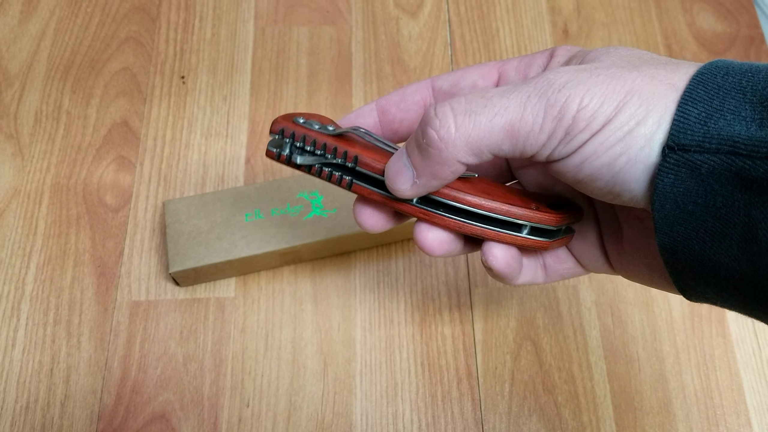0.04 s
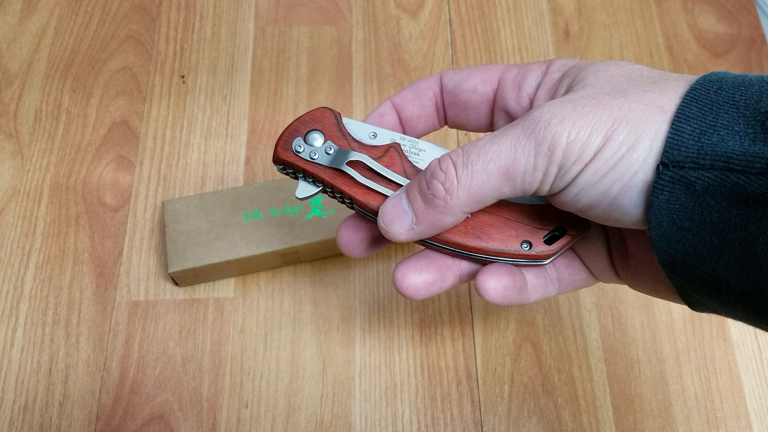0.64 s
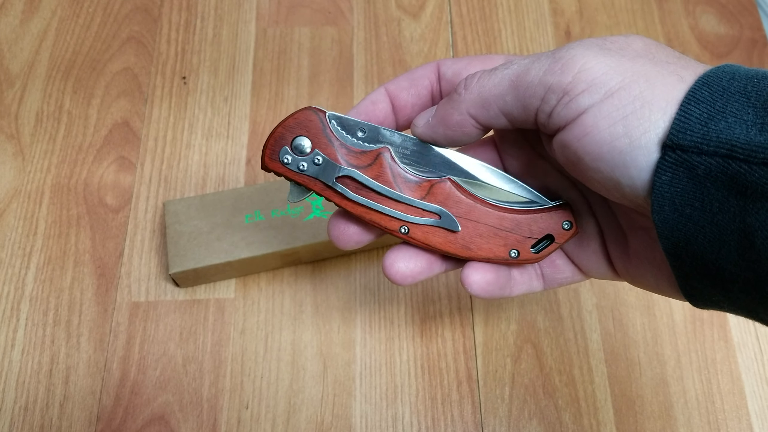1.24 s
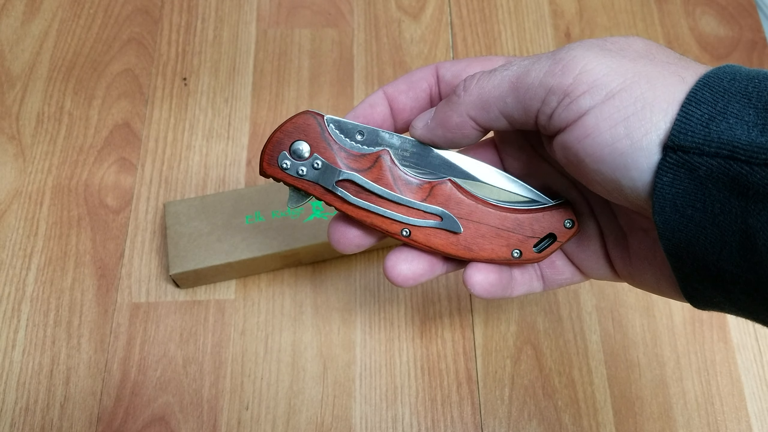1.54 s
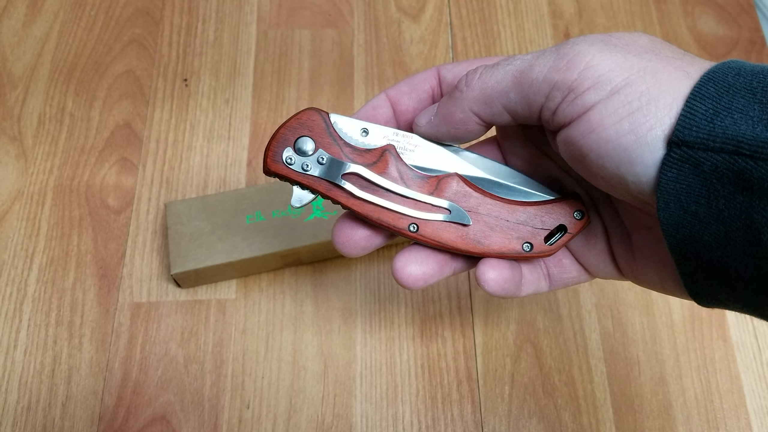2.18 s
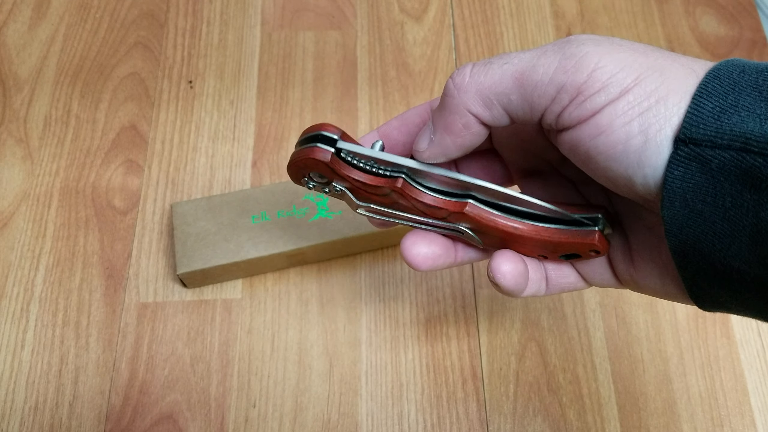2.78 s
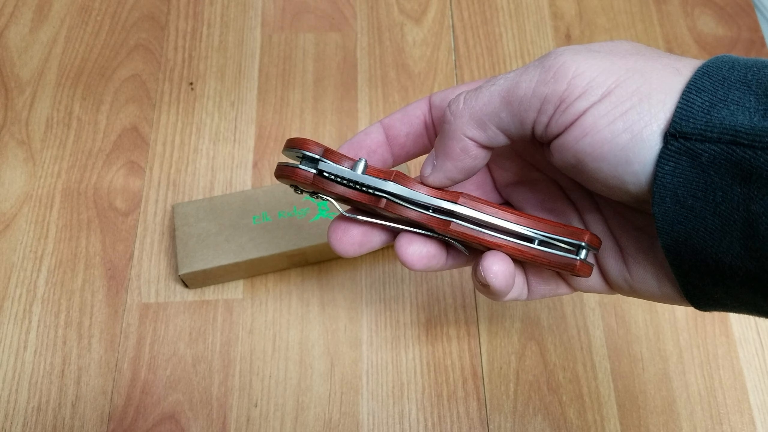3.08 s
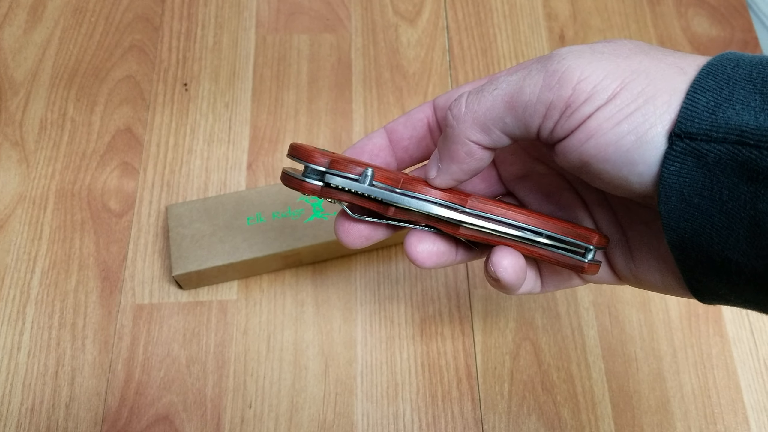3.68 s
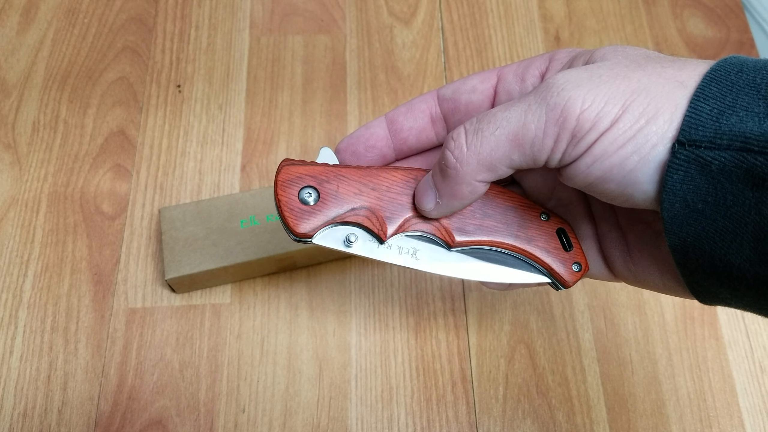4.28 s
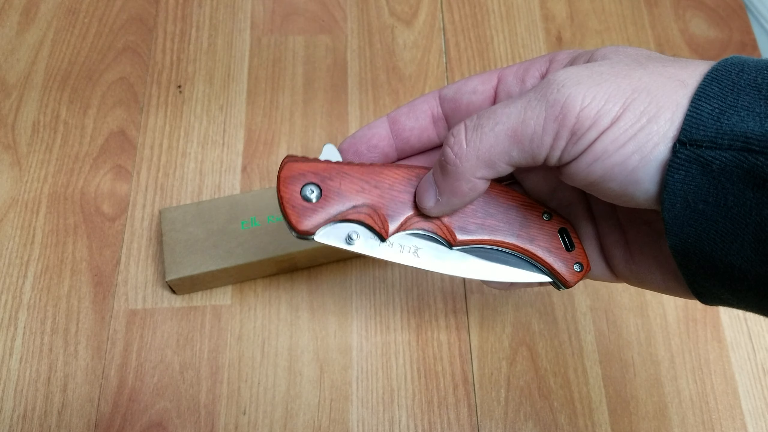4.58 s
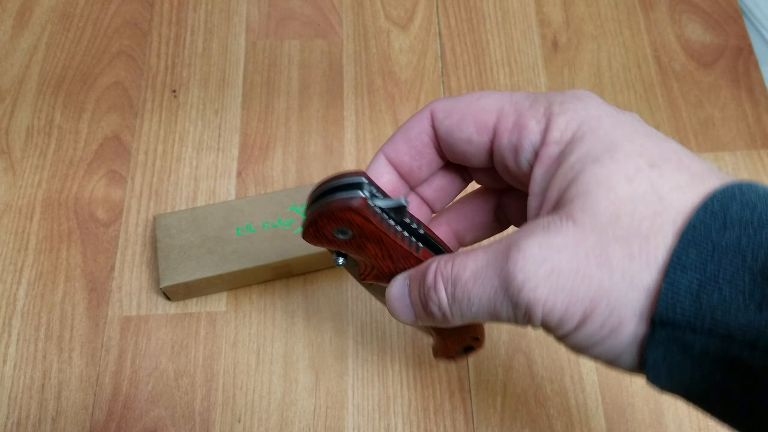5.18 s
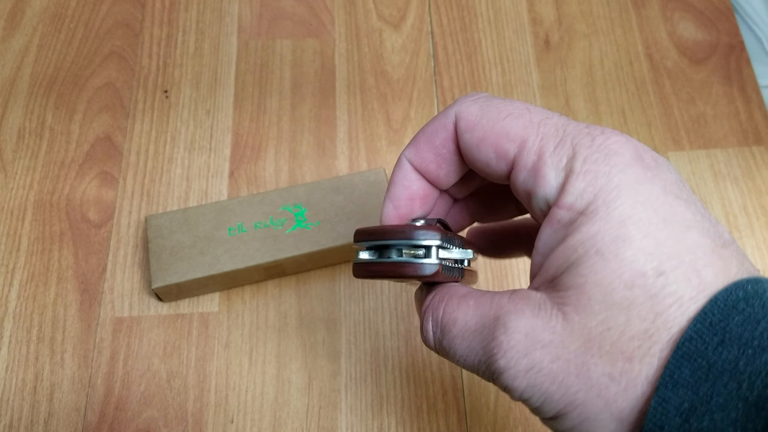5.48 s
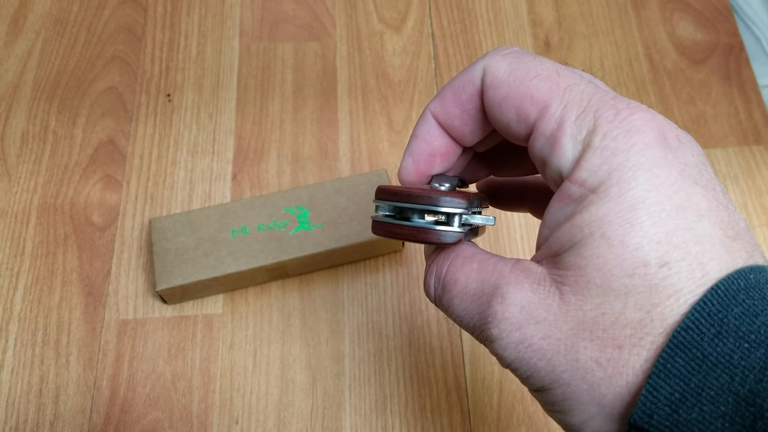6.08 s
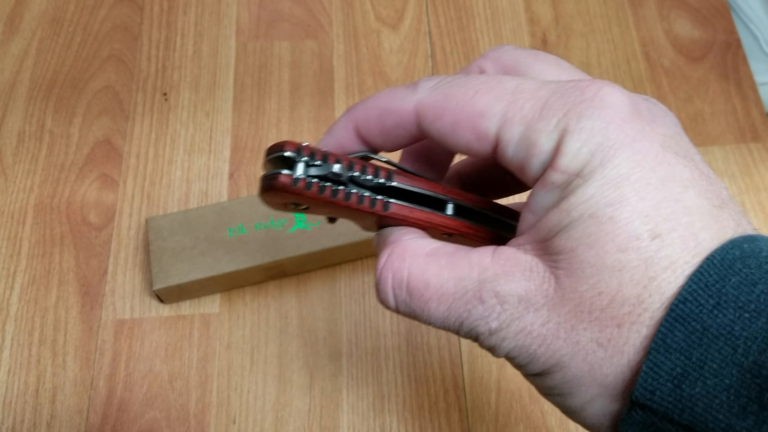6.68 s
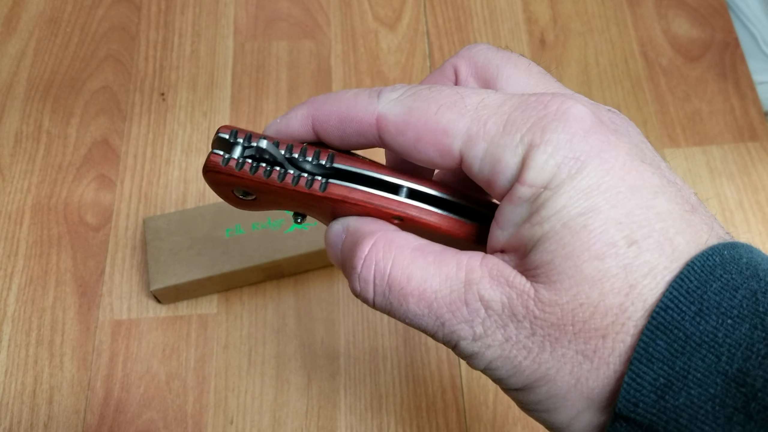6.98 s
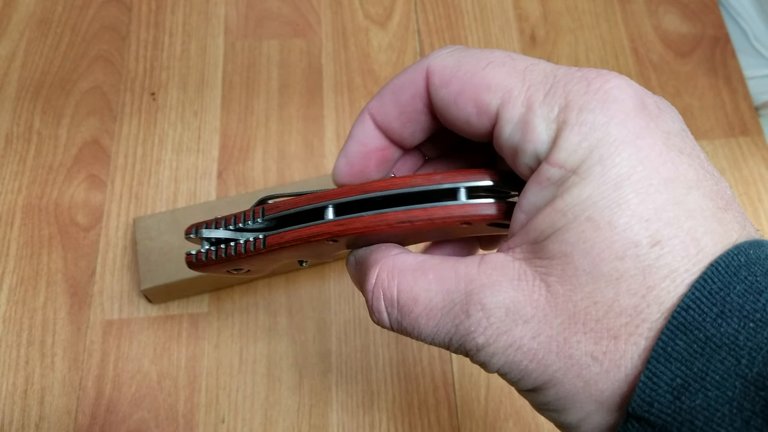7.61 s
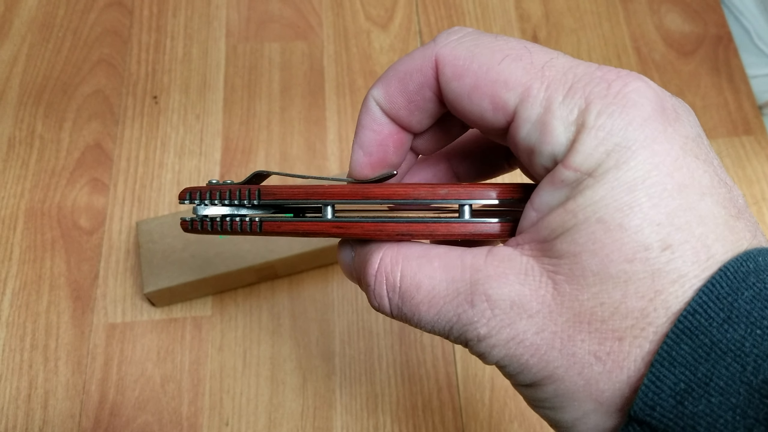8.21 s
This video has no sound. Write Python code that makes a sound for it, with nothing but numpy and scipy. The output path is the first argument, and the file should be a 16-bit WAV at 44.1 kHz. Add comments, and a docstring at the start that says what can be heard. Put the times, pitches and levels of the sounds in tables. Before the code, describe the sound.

Close handling of a folded pocket knife indoors: small metal clicks, finger taps, sliding skin, a heavy thump and a sharp metallic snap.

```python
"""A closed folding knife is turned over in one hand, close to a stereo microphone in a small quiet room.
Its steel parts click and once snap sharply, a little left of centre. Fingers tap the handle, skin slides
and squeaks over it, a sleeve rustles, and dull knocks reach the microphone, one of them heavy.
Under it all lie room tone, microphone hiss and a low rumble that dies away halfway through."""
import sys
import numpy as np
from scipy import signal
from scipy.fft import rfft, irfft
from scipy.io import wavfile
from scipy.ndimage import uniform_filter1d

SR = 44100
rng = np.random.default_rng(int(sys.argv[2]) if len(sys.argv) > 2 else 0)


def put_to_file(sound):
    """Save the sound as 16-bit audio at rate SR, in the file named by the first command-line argument."""
    columns = np.atleast_2d(sound).T  # one column per channel
    safe = np.clip(columns, -1, 1)
    whole_steps = np.round(safe * 32767)
    wavfile.write(sys.argv[1], SR, whole_steps.astype(np.int16))


N = 372644


def clicks(centre_hz=3270, lowest_hz=500, clack_octaves=0.89, rise_s=0.0022, size=16384):
    """The hand damps the steel, so a click has colour but no pitch; duller contacts rise more slowly."""
    # steel contacts: (time [s], level [dB], brightness [dB/octave], clack of the handle [dB])
    contacts = [(0.077, -61.5, 0, 1), (0.268, -57, 1.5, -4), (1.0648, -59, 2.5, 4.5),
                (1.2104, -57, -2.2, 6), (1.462, -59.5, -1.5, 1.5), (1.7746, -66, -1.5, 5.5),
                (2.1105, -58, -7, 7), (2.179, -66.5, -8, 7), (2.443, -62.5, -7.5, 9.5),
                (4.238, -54, 2.5, -1.5), (4.9305, -56.5, 2.5, -1), (5.071, -53.5, 1, -2.5),
                (5.8488, -52, 0.5, -5.5), (5.8781, -49.5, 2, -5.5), (5.9818, -66.5, -4, 9.5),
                (6.25, -63.5, -3, 7.5), (6.4163, -64.5, 2.5, 1.5), (6.569, -57.5, -4, 6),
                (6.6456, -59.5, -6.5, 18), (6.679, -55, -2.5, 8.5), (6.821, -48.5, -3, -6),
                (6.9863, -53.5, -4, -2.5), (7.045, -71, 1, 11.5), (7.0682, -56.5, -3, -3),
                (8.029, -58.5, 2.5, 14.5)]
    # colour of a click: (frequency [Hz], density [dB])
    colour = [(150, -17), (400, 2), (850, 0.5), (1250, 3), (1700, -3), (2200, 0), (3200, -2), (5000, -3),
              (6600, -6.5), (7500, -5), (9000, -7.5), (10700, -3.5), (12300, -3.5), (14000, -5.5),
              (16000, -2.5)]
    # damped resonances of liners and blade: (centre [Hz], width [Hz], boost [dB])
    rings = [(2280, 700, 5), (2900, 420, 2.5), (4630, 600, 4.5)]
    out, t, hz = np.zeros((2, N)), np.arange(size) / SR, np.fft.rfftfreq(size, 1 / SR)
    octaves = np.log2(np.maximum(hz, lowest_hz) / centre_hz)
    clack_hump = np.exp(-.5 * (octaves / clack_octaves) ** 2)
    rings_db = peaks_db(rings, hz)
    for start, db, brightness, clack_db in contacts:
        spray = noise(colour, size, db + brightness * octaves + clack_db * clack_hump + rings_db)
        rise = rise_s / 2 ** (brightness / 7.5)  # 7.5 dB/octave brighter is twice as quick
        add(out, start, spray * strike(t, rise, t60_s=0.19, tick=1.1, tick_s=0.0034))
    return out * pan(2.8)


def snap(size=16384):
    """Steel on steel: a hard, dry snap that rattles briefly and brings out the metal's resonances."""
    # the snap and its two rebounds: (time [s], level [dB])
    hits = [(5.1005, -38.5), (5.105, -41.5), (5.123, -51.5)]
    # colour of the snap: (frequency [Hz], density [dB])
    colour = [(150, -12), (400, -3.5), (700, -15.5), (1000, -16.5), (2200, -5), (4500, -8), (6600, -11),
              (9000, -13.5), (12000, -8.5), (16000, -10)]
    # quickly damped resonances: (centre [Hz], width [Hz], boost [dB])
    rings = [(1730, 780, 7), (7500, 520, -2), (10800, 900, 4), (13900, 700, 8), (15400, 500, 8)]
    out, t, hz = np.zeros((2, N)), np.arange(size) / SR, np.fft.rfftfreq(size, 1 / SR)
    envelope = strike(t, rise_s=0.00064, t60_s=0.155, tick=0.98, tick_s=0.0026)
    for start, db in hits:
        add(out, start, amp(db) * noise(colour, size, peaks_db(rings, hz)) * envelope)
    return out * pan(2.4)


def knocks(decay_s=0.016, scuff_db=1, scuff_growth=0.57, size=16384):
    """Soft contacts reach the microphone as low modes, with a dull scuff that grows with force."""
    # dull knocks: (time [s], boom level [dB], knock above boom [dB], tilt [dB/octave], rise [s])
    contacts = [(1.063, -44, -3, -1.5, 0.0032), (2.8443, -32, -3, 0.5, 0.0035),
                (2.862, -32, -11.5, -2.5, 0.0023), (3.894, -16, -4, 1, 0.011),
                (3.943, -26.5, -24, -6, 0.0022), (4.258, -42, -4, -10.5, 0.0029),
                (5.098, -54.5, 2, -12, 0.0098)]
    # modes of the deep boom: (frequency [Hz], level [dB])
    boom_modes = [(78, -20), (100, -3.5), (128, -3), (197, 7.5), (216, -5)]
    # modes of the knock above it: (frequency [Hz], level [dB])
    knock_modes = [(272, 5.5), (302, 7.5), (345, 3), (421, 7.5), (512, 2), (594, -4), (677, -8.5),
                   (761, -11.5), (911, -14), (1055, -13), (1320, -22.5)]
    # colour of the scuff: (frequency [Hz], density [dB])
    scuff_colour = [(200, -3.5), (500, -2.5), (900, -2.5), (1300, -7.5), (1750, -12.5), (2300, -13),
                    (3200, -24), (5000, -34), (8000, -46), (12000, -41), (16000, -38)]
    out, t = np.zeros((2, N)), np.arange(size) / SR
    for start, db, above_db, tilt, rise in contacts:
        boom = ringing(boom_modes, t, tilt) * pan(2.2)
        knock = amp(above_db) * ringing(knock_modes, t, tilt) * pan(0.34)
        ring = (boom + knock) * swell(t, rise, decay_s)
        scuff = amp(above_db + scuff_db + scuff_growth * db) * noise(scuff_colour, size) * pan(4.46)
        scuff *= swell(t, 0.888 * rise, 1.6 * decay_s)
        add(out, start, amp(db) * (ring + scuff))
    return out


def taps(overtone_ratio=1.55, overtone_db=-6, puff_db=-10, size=8192):
    """A fingertip damps its own tap: a few cycles of two low modes and a soft puff."""
    # fingertips on the handle: (time [s], level [dB], pitch [Hz])
    touches = [(0.054, -45.5, 227), (0.117, -46, 230), (0.158, -46.5, 240), (0.237, -48.5, 343),
               (0.275, -47.5, 225), (1.016, -55.5, 366), (1.065, -38, 361), (1.106, -47.5, 225),
               (1.196, -53.5, 277), (1.33, -48, 315), (1.463, -48, 223), (2.109, -46.5, 227),
               (3.034, -51, 276), (3.128, -53.5, 270), (3.769, -48, 221), (6.983, -52.5, 278),
               (7.045, -54, 255), (8.182, -49.5, 327)]
    # colour of the puff: (frequency [Hz], density [dB])
    puff_colour = [(50, -18.0), (200, 5), (450, -5.5), (900, -12.5), (4000, -44)]
    out, t = np.zeros((2, N)), np.arange(size) / SR
    for start, db, hz in touches:
        phase = 2 * np.pi * hz * t
        tone = np.sin(phase) + amp(overtone_db) * np.sin(overtone_ratio * phase)
        puff = amp(puff_db) * noise(puff_colour, size)
        add(out, start, amp(db) * (tone + puff) * swell(t, rise_s=0.0026, decay_s=0.0088))
    return out * pan(0.73)


def sliding(grain_db=1.2, unevenness_db=2.5):
    """Skin catches and slips on wood and steel: an uneven hiss that follows the fingers."""
    # strokes over the handle: (start [s], length [s], rub level [dB], fizz level [dB])
    strokes = [(0.993, 0.069, -83, -74), (1.283, 0.33, -67.5, -71.5), (1.93, 0.22, -66.5, -71.5),
               (2.439, 0.27, -62, -64), (2.613, 0.5, -57.5, -63), (4.36, 0.3, -74.5, -71),
               (5.804, 0.065, -66.5, -70), (6.238, 0.17, -69.5, -73.5), (6.522, 0.07, -59.5, -71),
               (6.73, 0.19, -64.5, -72), (7.01, 0.66, -72, -75.5), (7.59, 0.16, -69.5, -70),
               (8.116, 0.29, -67.5, -95)]
    # midrange rub of skin: (frequency [Hz], density [dB])
    rub_colour = [(200, -7), (430, 4.5), (700, 0.5), (1400, -3), (2300, 3), (3300, -6.5), (4800, -2.5),
                  (7000, -29), (16000, -29)]
    # treble fizz above it: (frequency [Hz], density [dB])
    fizz_colour = [(3000, -18.5), (6000, 1), (9000, -2.5), (11500, 3.5), (15500, 1)]
    rub, fizz = np.zeros(N), np.zeros(N)
    for start, length, rub_db, fizz_db in strokes:
        pressure = arch(start, length)
        rub += amp(rub_db) * pressure
        fizz += amp(fizz_db) * pressure
    catches = unit_rms(uniform_filter1d(rng.standard_normal(N), size=200))
    drift = unit_rms(uniform_filter1d(rng.standard_normal(N), size=1500))
    grain = amp(grain_db * catches + unevenness_db * drift)
    return grain * (rub * noise(rub_colour, N) + fizz * noise(fizz_colour, N)) * pan(3.2)


def squeaks(size=8192):
    """Slipping skin briefly settles on one fuzzy pitch."""
    # slips on wood and steel: (time [s], pitch [Hz], level [dB], length [s])
    slips = [(0.714, 5700, -73, 0.039), (2.277, 5360, -72, 0.07), (2.434, 2190, -51, 0.028),
             (6.543, 1250, -58, 0.017)]
    # colour of a squeak: (frequency [multiple of the pitch], density [dB])
    colour = [(.3, -56), (.7, -57), (.88, 6.5), (1, 1), (1.12, -28), (1.5, -23), (3, -62)]
    out = np.zeros((2, N))
    for start, hz, db, length in slips:
        window = np.hanning(round(length * SR))
        whistle = noise([(multiple * hz, level) for multiple, level in colour], size)
        add(out, start, amp(db) * whistle[:, :len(window)] * window)
    return out * pan(5)


def sleeve(level_db=-60.5):
    """One soft, dull rustle of cloth as the wrist rolls the knife over."""
    # colour of the cloth: (frequency [Hz], density [dB])
    colour = [(100, -9), (220, -1), (430, 8.5), (800, -2.5), (1400, -12.5), (2300, -11), (5000, -31),
              (16000, -36.5)]
    return amp(level_db) * arch(start_s=3.464, length_s=0.9) * noise(colour, N) * pan(1.4)


def room(sound, build_s=0.028, size=32768):
    """The small room answers with a short diffuse tail, each band dying at its own speed."""
    # colour of the reflections: (frequency [Hz], level [dB])
    colour = [(60, -1.5), (200, -6), (300, -2.5), (430, 4.5), (700, -8.5), (16000, 5)]
    # reverberation: (frequency [Hz], time to fall 60 dB [s])
    t60 = [(100, 0.51), (420, 0.542), (900, 0.15), (3000, 0.77), (14000, 0.19)]
    hz, t, bands = signal.stft(noise(colour, size), SR, nperseg=256)
    decay = amp(-60 * t / curve_at(t60, hz)[:, None])
    onset = 1 - np.exp(-t / build_s)
    tail = signal.istft(bands * decay * onset, SR, nperseg=256)[1]
    return signal.fftconvolve(sound, tail / np.linalg.norm(tail[0]), axes=1)[:, :N]


def background(air_db=-64, rumble_db=-62.5, floor_db=-87.5, fade_start_s=4.53, fade_db_per_s=35):
    """Steady room tone and hiss, and a low rumble that holds, then fades to a faint floor."""
    # still room with microphone hiss: (frequency [Hz], density [dB])
    air_colour = [(20, 11), (45, -8), (100, 0), (180, -4), (300, -4.5), (430, 0.5), (600, -7.5), (1000, -7),
                  (1600, -11.5), (2300, -11), (4500, -17.5), (8400, -26), (12000, -20.5), (16000, -16.5)]
    # low rumble: (frequency [Hz], density [dB])
    rumble_colour = [(20, 3.5), (45, 4), (100, 1.5), (200, 1.5), (280, -8.5), (450, -15.5), (900, -41),
                     (3000, -69)]
    fade_db = fade_db_per_s * np.maximum(np.arange(N) / SR - fade_start_s, 0)
    rumble = (amp(rumble_db - fade_db) + amp(floor_db)) * noise(rumble_colour, N)
    return (amp(air_db) * noise(air_colour, N) + rumble) * pan(1.3)


def strike(t, rise_s, t60_s, tick, tick_s):
    """The envelope of a hard contact: a sharp tick, then a short spray of reflections."""
    return (1 - np.exp(-t / rise_s)) * (amp(-60 * t / t60_s) + tick * np.exp(-t / tick_s))


def swell(t, rise_s, decay_s):
    """The envelope of a soft contact, with peak 1."""
    shape = (1 - np.exp(-(t / rise_s) ** 2)) * np.exp(-t / max(decay_s, .002))
    return shape / shape.max()


def arch(start_s, length_s, skew=0.82, sharpness=1.8):
    """The pressure of one stroke: it lands, peaks a little before the middle and lifts."""
    progress = (np.arange(N) / SR - start_s) / length_s
    inside, pressure = (progress > 0) & (progress < 1), np.zeros(N)
    pressure[inside] = np.sin(np.pi * progress[inside] ** skew) ** sharpness
    return pressure


def ringing(modes, t, tilt):
    """A sum of modes at rms 1, tilted in dB per octave; a softer contact favours the low ones."""
    return unit_rms(sum(amp(db + tilt * np.log2(hz)) * np.sin(2 * np.pi * hz * t) for hz, db in modes))


def peaks_db(rings, hz):
    """Broad resonances as a gain in dB per frequency."""
    return sum(db / (1 + (2 * (hz - centre) / width) ** 2) for centre, width, db in rings)


def noise(colour, size, shade_db=0):
    """Coloured stereo noise at rms 1, then shaded per frequency; the channels agree only in the bass."""
    # likeness of the microphone's two sides: (frequency [Hz], correlation [0-1])
    correlation = [(60, .9), (200, 0.78), (400, 0.68), (700, 0.34), (1400, 0), (16000, 0)]
    hz = np.fft.rfftfreq(size, 1 / SR)
    left, independent = rfft(rng.standard_normal((2, size)))
    likeness = curve_at(correlation, hz)
    right = likeness * left + np.sqrt(1 - likeness ** 2) * independent
    gain = unit_rms(amp(curve_at(colour, hz))) * amp(shade_db)
    return irfft(np.array([left, right]) * gain, size)


def pan(left_db):
    """Channel gains for a source that is left_db louder on the microphone's left."""
    return amp(np.array([[left_db], [-left_db]]) / 2)


def add(mix, start_s, sound):
    """Adds a stereo sound to the mix at its start time."""
    part = mix[:, max(0, round(start_s * SR)):][:, :sound.shape[-1]]
    part += sound[..., :part.shape[1]]


def curve_at(points, hz):
    """Interpolates a table on a log-frequency axis."""
    frequencies, values = np.transpose(points)
    return np.interp(np.log(hz + 1), np.log(frequencies + 1), values)


def amp(db):
    """Decibels to gain."""
    return 10 ** (np.asarray(db) / 20)


def unit_rms(x):
    """Scales to rms 1."""
    return x / np.sqrt(np.mean(x ** 2) + 1e-20)


def scene():
    """Knife, knocks, fingers and sleeve at close range, with the room faint behind them."""
    steel = clicks() + snap()
    thuds = knocks() + taps()
    reflections = room(amp(-22) * steel + amp(-22.5) * thuds)
    return steel + thuds + reflections + sliding() + sleeve() + squeaks() + background()


def record(dry):
    """The microphone's bass roll-off and the recorder's band limit."""
    low_cut_hz, top_hz = 98, 15870
    low_cut = signal.butter(1, low_cut_hz, "high", fs=SR, output="sos")
    band_limit = signal.firwin(511, top_hz, window=("kaiser", 9), fs=SR)
    return signal.oaconvolve(signal.sosfilt(low_cut, dry), band_limit[None], "same")


dry = scene()
out = record(dry)
put_to_file(out)
```